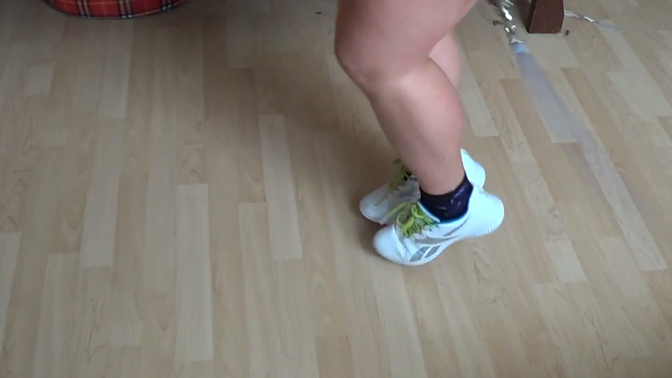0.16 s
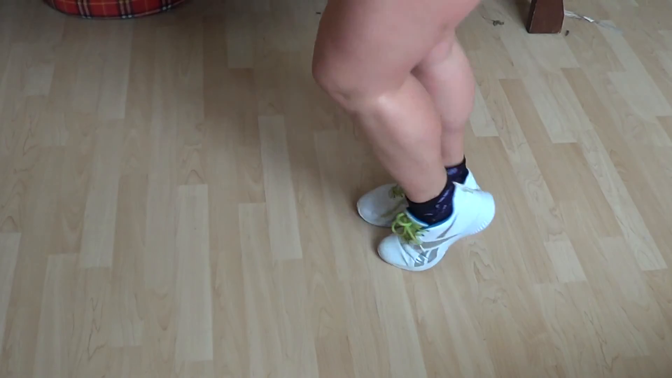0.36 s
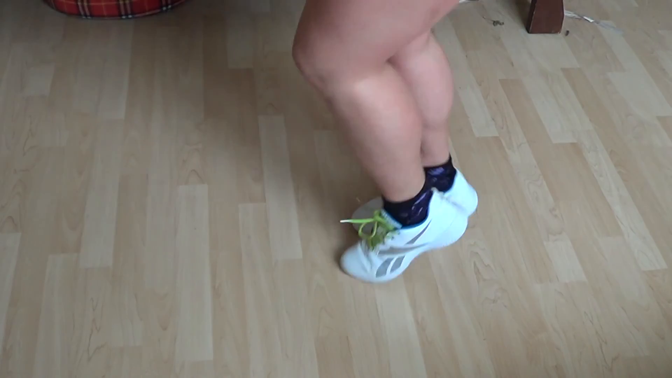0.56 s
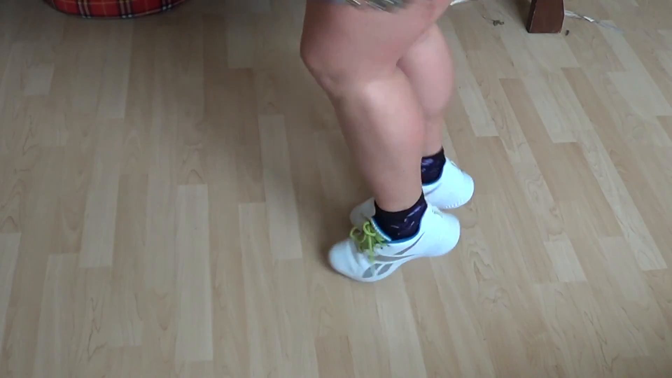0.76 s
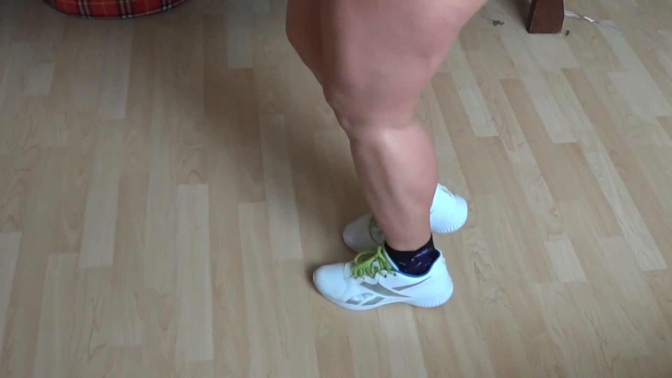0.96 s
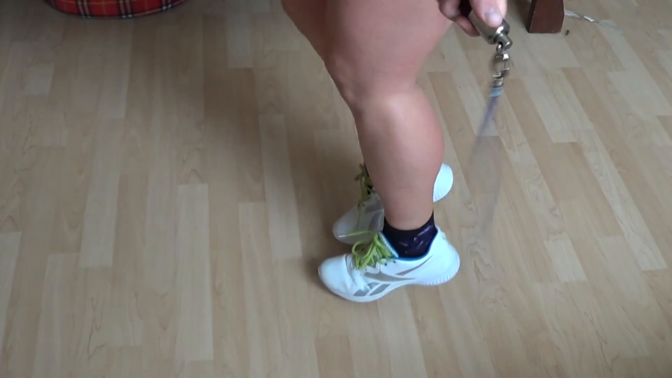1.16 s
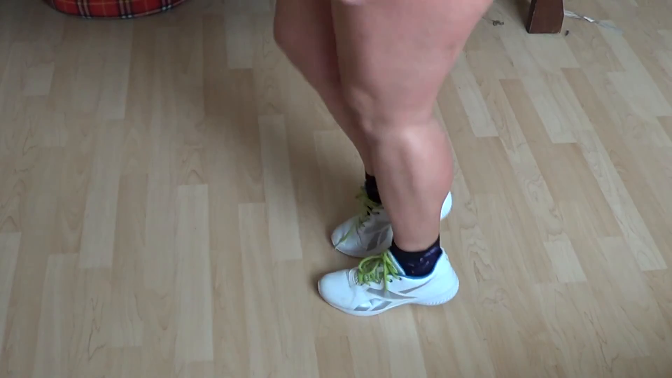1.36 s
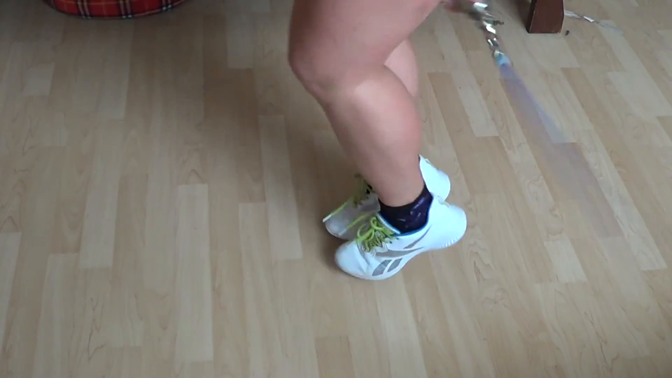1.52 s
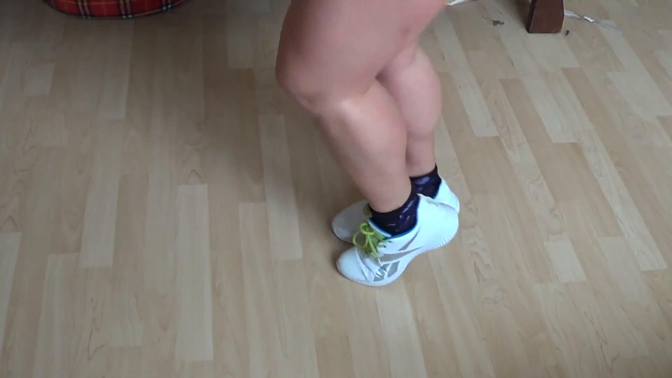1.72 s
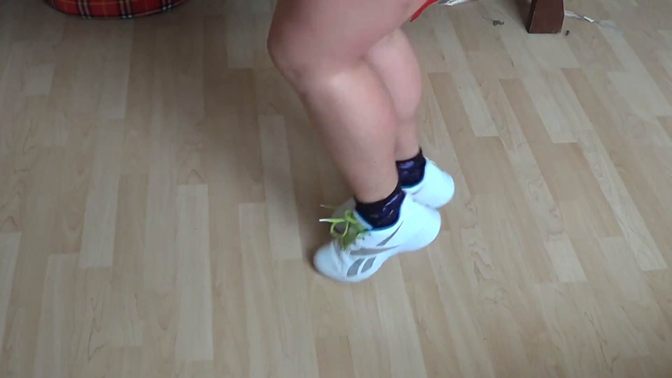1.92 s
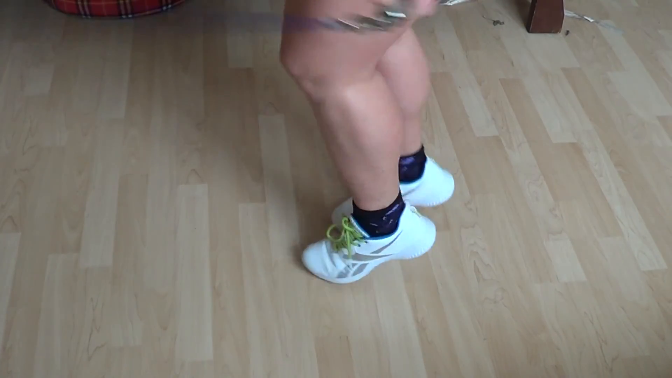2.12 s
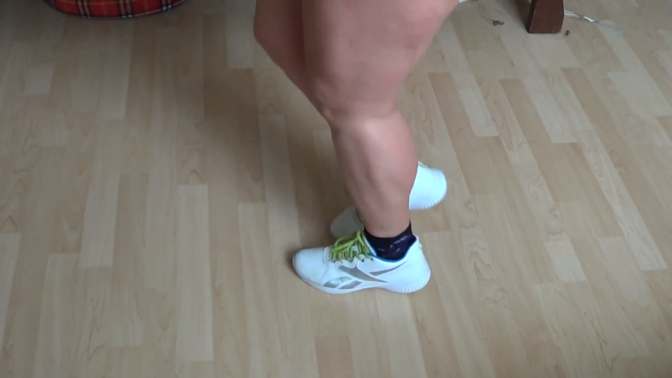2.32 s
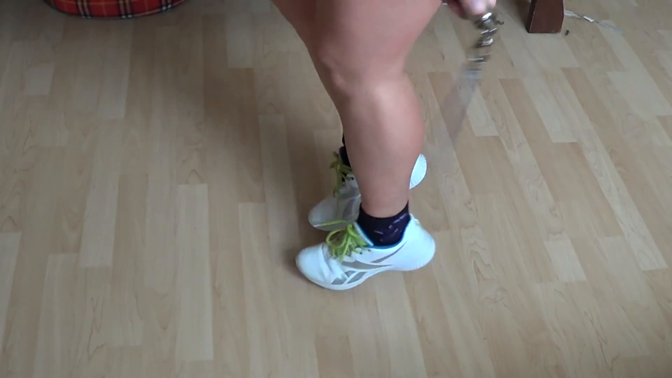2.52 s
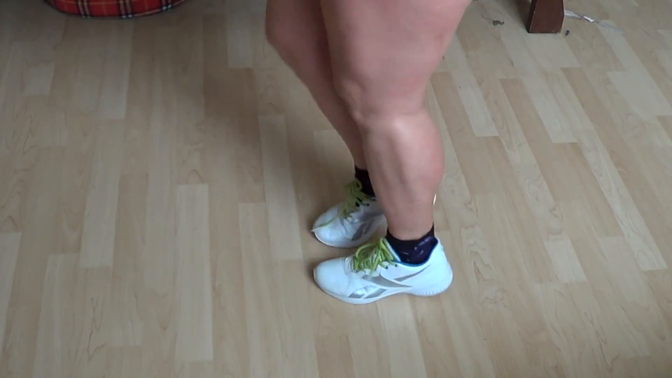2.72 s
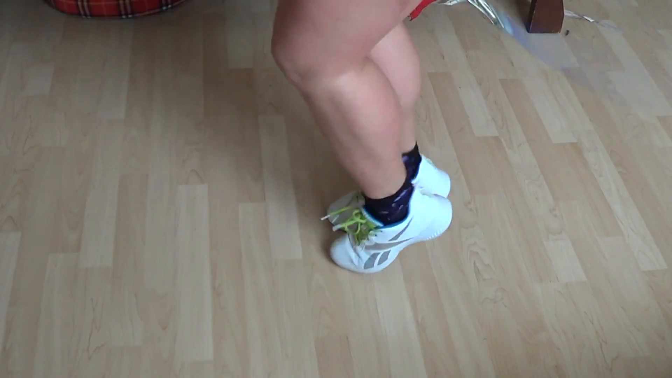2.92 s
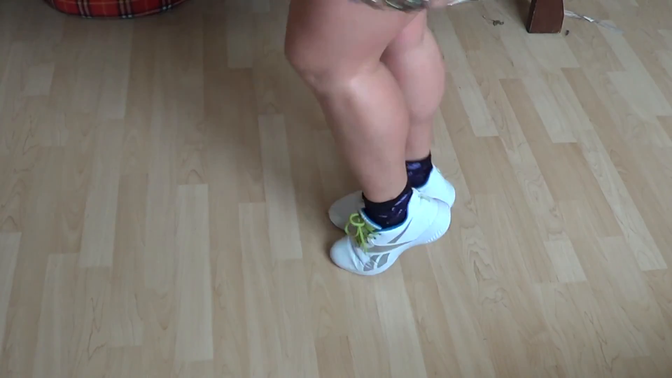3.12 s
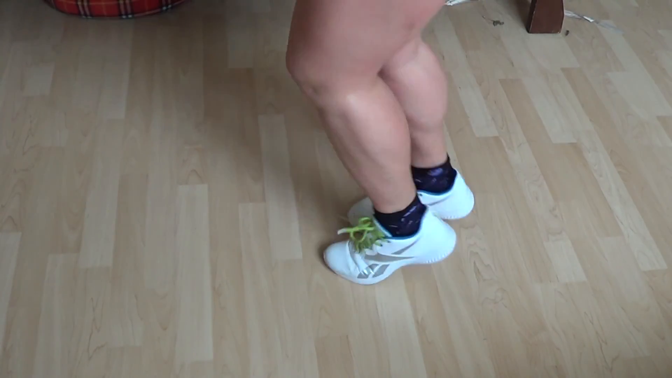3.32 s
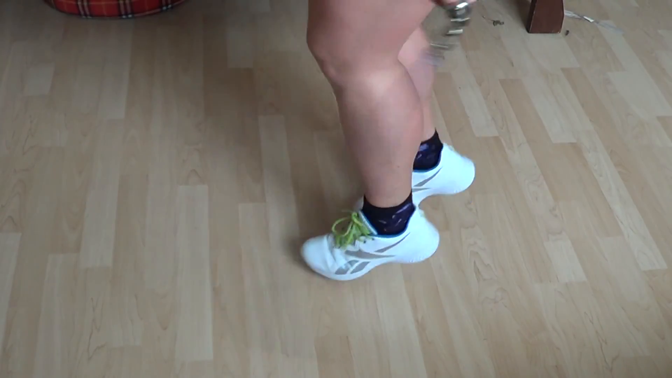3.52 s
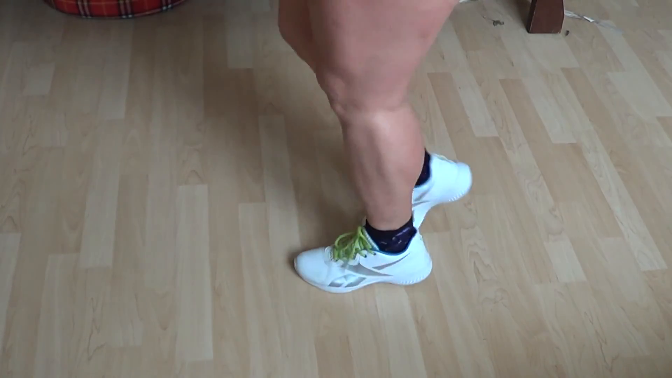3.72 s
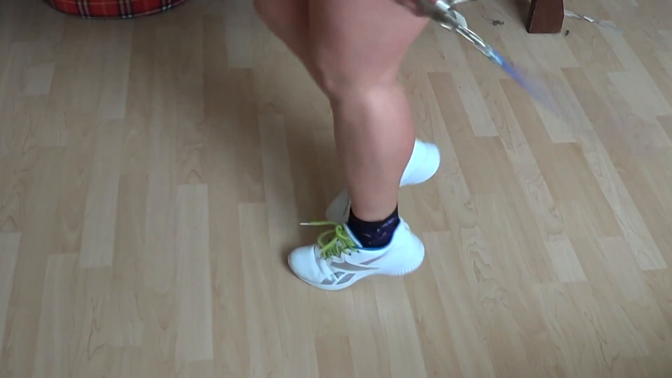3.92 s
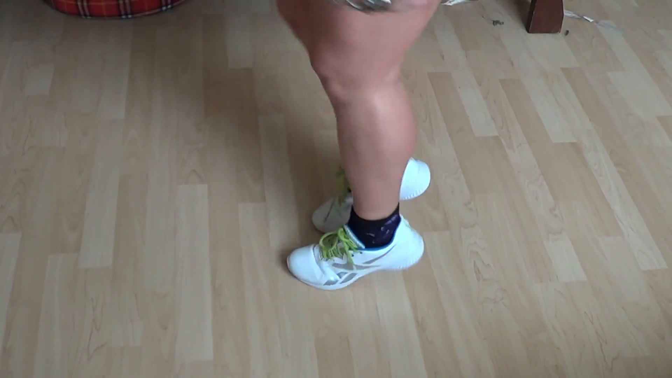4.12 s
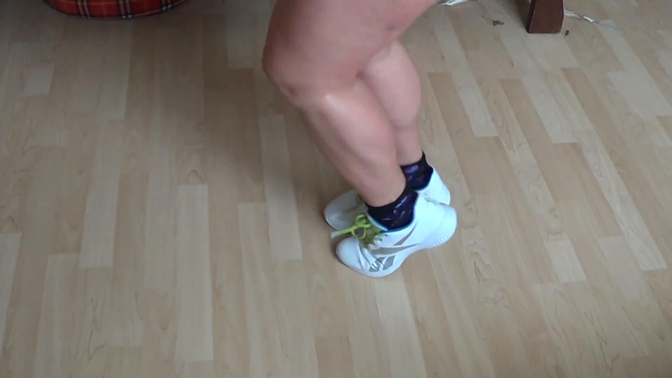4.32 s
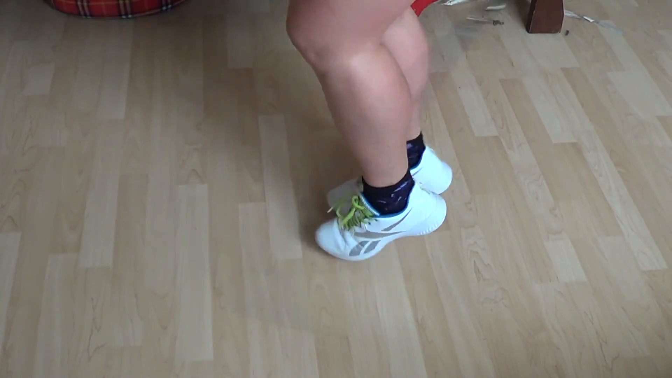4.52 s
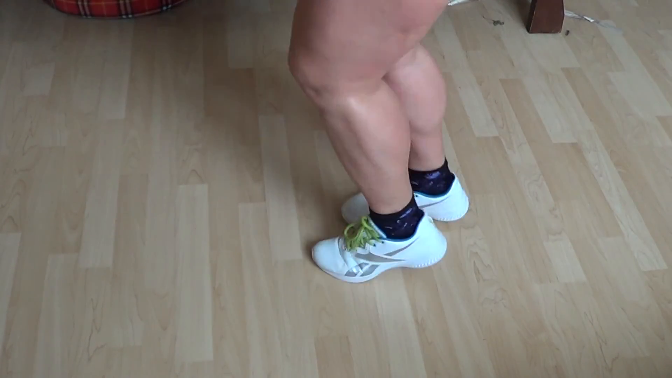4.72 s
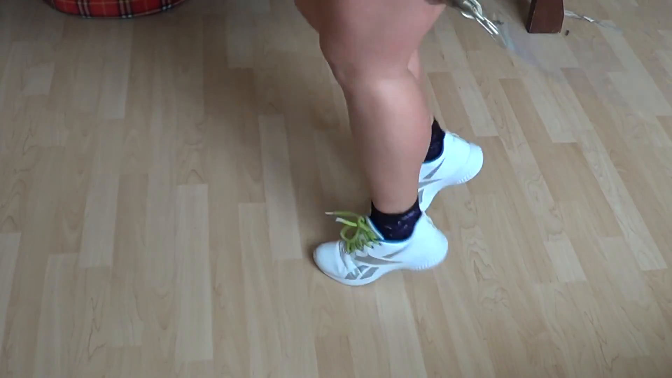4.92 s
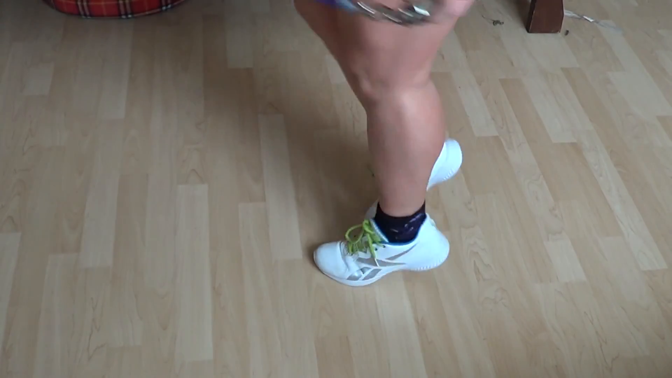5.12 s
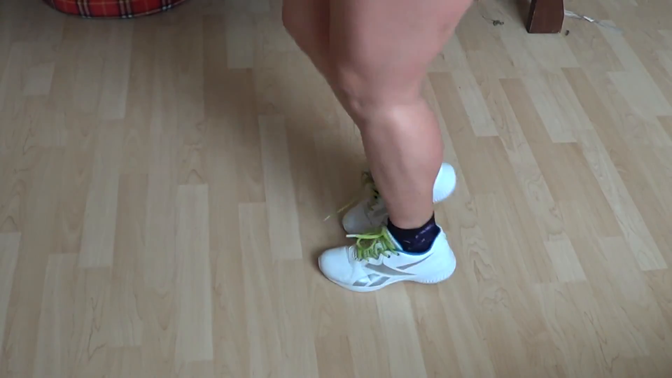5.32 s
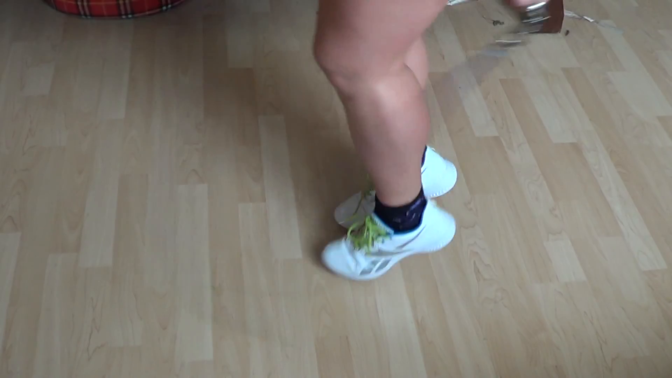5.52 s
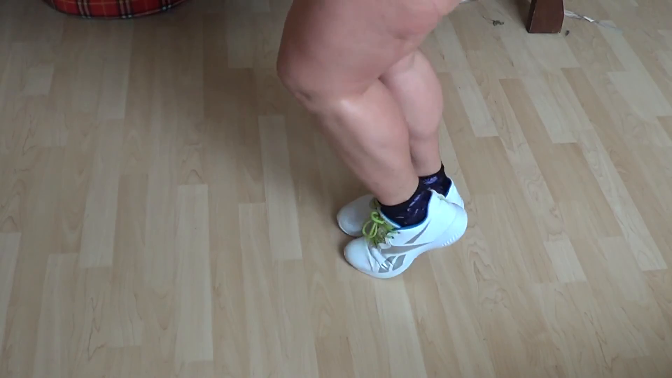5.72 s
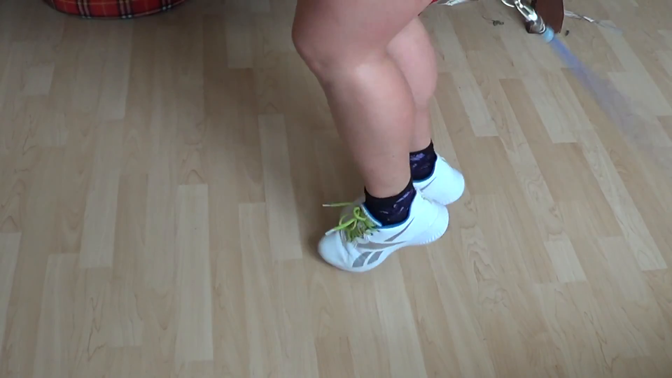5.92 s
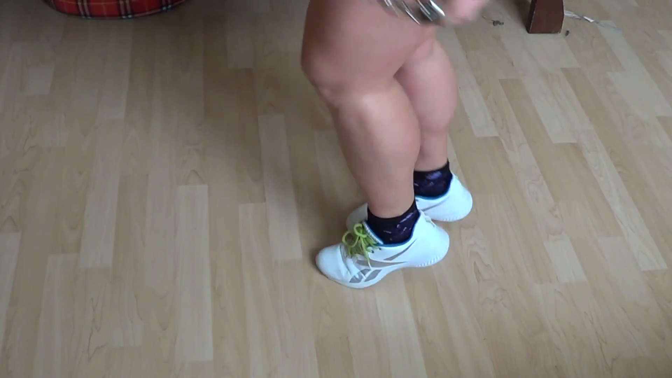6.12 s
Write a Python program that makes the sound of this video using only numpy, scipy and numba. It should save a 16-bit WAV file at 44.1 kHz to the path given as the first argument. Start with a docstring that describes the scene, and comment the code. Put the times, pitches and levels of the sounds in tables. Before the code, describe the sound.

Someone skips rope at a steady pace, about three turns a second, in a small bare room. Each turn brings a hard, bright crack on laminate with quick wall echoes and a short hissing ring. Between cracks the thin rope whistles, rising as it swoops down, and rubber soles tap and thud dully on the planks. The microphone is close, with automatic level control squeezing each crack and its room ring.

```python
"""A thin skipping rope cracks on a laminate floor three times a second in a small bare room.
Each crack is a filtered impulse with wall echoes and a noise tail; between cracks the rope
whistles as narrow bands of gliding noise. Shoes land in between as struck floor resonances and
gritty taps, over a faint steady hush. A fast level control ducks every crack, so the room's ring
first holds and then fades."""
import sys
import numpy as np
from scipy import signal
from scipy.fft import rfft, irfft, next_fast_len
from scipy.io import wavfile
from scipy.ndimage import uniform_filter1d, minimum_filter1d
from numba import njit

SR = 44100
rng = np.random.default_rng(int(sys.argv[2]) if len(sys.argv) > 2 else 0)


def waveform_to_disk(signal):
    """Save audio, clipped to [-1, 1], as 16-bit WAV at the path in sys.argv[1]."""
    frames = np.transpose(np.atleast_2d(signal))
    scaled = np.clip(frames, -1, 1) * 32767
    samples = np.round(scaled).astype(np.int16)
    wavfile.write(sys.argv[1], SR, samples)


N = 272097  # samples heard
LEAD = SR // 2  # samples played before the start, so earlier blows still ring


def undb(db):
    """Gain of a level in dB."""
    return 10 ** (np.asarray(db) / 20)


def along(table, hz):
    """Read a (Hz, value) table on a log-frequency axis."""
    table_hz, values = np.array(table).T
    return np.interp(np.log(np.maximum(hz, 1)), np.log(table_hz), values)


def interleave(*columns):
    """Turn columns of curve points into one running list, row after row."""
    return np.ravel(columns, order="F")


def train(start_s, size):
    """One impulse per event."""
    out = np.zeros(N + LEAD)
    np.add.at(out, (np.asarray(start_s) * SR).astype(int) + LEAD, size)
    return out


def pair(mid, side):
    """Left and right from mid and side."""
    return np.array([mid + side, mid - side])


def walk(rate):
    """Random levels held 1 / rate s and slewed."""
    hold = int(SR / rate)
    steps = np.repeat(rng.standard_normal((N + LEAD) // hold + 1), hold)
    return uniform_filter1d(steps, hold)[:N + LEAD]


def causal(gain):
    """Minimum-phase spectrum with this gain: nothing rings before the blow."""
    cepstrum = irfft(np.log(gain))
    cepstrum[1:len(gain) - 1] *= 2
    cepstrum[len(gain):] = 0
    return np.exp(rfft(cepstrum))


def ring(x, modes):
    """Sum of decaying resonances; a unit impulse starts each at its dB."""
    out = 0
    for hz, db, t60 in modes:
        pole = np.exp(2j * np.pi * hz / SR - np.log(1000) / (t60 * SR))
        out = out + undb(db) * signal.lfilter([1], [1, -pole], x).imag
    return out


@njit
def svf(x, hz, width):
    """State-variable band-pass with moving centre and width, gain 1 at the centre."""
    y, band, low = np.empty(len(x)), 0., 0.
    for i in range(len(x)):
        g, k = np.tan(np.pi * hz[i] / SR), width[i] / hz[i]
        v = (band + g * (x[i] - low)) / (1 + g * (g + k))
        band, low, y[i] = 2 * v - band, low + 2 * g * v, k * v
    return y


@njit
def follow(x, attack, release):
    """Envelope that jumps up fast and sinks more slowly."""
    y, e = np.empty(len(x)), 0.
    for i in range(len(x)):
        e += (x[i] - e) * (attack if x[i] > e else release)
        y[i] = e
    return y


# How long the room rings. Each row: frequency in Hz, decay time in s before each layer's own share.
ROOM_DECAY = [(200, 0.73), (1000, 0.48), (3000, 0.54), (5000, 0.53), (9000, 0.46), (12000, 0.32),
              (16000, 0.35)]
# Stereo spread of the room. Each row: frequency in Hz, side level minus mid level in dB.
ROOM_WIDTH = [(40, -47), (250, -14.5), (1000, -8), (3000, -9.5), (5500, -6.5), (9000, -7.5), (12000, -17),
              (16000, -82)]


def diffuse(power, colour, t60_share, rise_ms):
    """Dense reflections: overlapping noise bands, each swelling after a blow and dying at its own rate."""
    size = next_fast_len(N + LEAD)
    f = np.arange(size // 2 + 1) * SR / size
    gain = undb(along(colour, f))
    gain /= np.sqrt(np.mean(gain ** 2))
    mid = rfft(rng.standard_normal(size)) * gain
    side = rfft(rng.standard_normal(size)) * gain * undb(along(ROOM_WIDTH, f))
    rise = np.exp(-1000 / (rise_ms * SR))
    out = 0
    for hz in 25 * 2 ** np.arange(0, 9.6, .5):  # half-octave steps
        octaves_away = np.log2(np.maximum(f, 1) / hz)
        band = np.cos(np.pi * np.clip(octaves_away, -.5, .5)) ** 2  # neighbours sum to one
        fall = np.exp(-2 * np.log(1000) / (t60_share * along(ROOM_DECAY, hz) * SR))
        swell_and_fall = np.convolve([1, -fall], [1, -rise])
        shape = np.sqrt(signal.lfilter([1 - rise], swell_and_fall, power))
        noise = irfft([mid * band, side * band], size)[:, :N + LEAD]
        out = out + shape * pair(*noise)
    return out


# Tone of the house hush. Each row: frequency in Hz, relative level in dB per Hz.
HUSH_COLOUR = [(25, -18), (60, -4.5), (90, -16), (160, -7.5), (500, -14.5), (2000, -11.5), (5000, -9.5),
               (12000, -16), (17000, -53)]
HUSH_DB = -43.5


def house_hush():
    """Faint steady noise: one impulse into reflections that practically never decay."""
    return undb(HUSH_DB) * diffuse(train([-LEAD / SR], 1.), HUSH_COLOUR, 1e6, rise_ms=1.)


# Shoes landing. Each row: start in seconds, relative knock level in dB, pitch favoured by the spot in Hz,
# relative sole tap level in dB, relative weight on the boards in dB, relative weight on the joists in dB.
LANDINGS = [(-0.07, -25.5, 200, -30, -32, -35), (0.235, -25, 428, -28, -41.5, -35),
            (0.604, -28, 260, -20.5, -39.5, -41), (0.9, -25.5, 452, -22, -39, -52),
            (0.931, -27, 160, -30, -49, -26), (1.241, -21, 450, -16, -57, -35),
            (1.287, -28.5, 150, -30, -35.5, -44), (1.603, -27, 255, -39, -41, -35),
            (1.965, -21.5, 267, -20, -46, -30), (2.273, -24.5, 450, -22, -37.5, -48),
            (2.312, -24.5, 268, -25, -50, -29), (2.623, -22.5, 467, -26, -34.5, -46),
            (2.669, -32, 170, -42, -43, -34.5), (2.967, -28.5, 256, -46, -46.5, -36.5),
            (3.267, -30, 328, -21, -43, -44), (3.318, -26.5, 251, -26, -36.5, -31),
            (3.618, -26.5, 268, -19, -31, -49), (3.653, -27, 253, -26, -40, -43),
            (3.954, -25, 455, -42, -35.5, -42), (3.997, -26, 277, -40, -51, -26.5),
            (4.282, -30.5, 167, -44, -37.5, -41), (4.655, -26, 200, -24.5, -40, -31.5),
            (4.955, -24.5, 437, -27, -57.5, -49), (4.998, -41, 167, -30, -43, -35),
            (5.305, -26, 460, -32, -44.5, -31), (5.643, -29, 164, -28, -48, -38),
            (5.95, -37, 194, -29, -59, -43), (5.993, -29.5, 256, -41, -46, -31)]
# Plank resonances. Each row: pitch in Hz, relative level in dB, decay time in s.
PLANK_MODES = [(166.3, -10.5, 0.64), (192, -13, 0.34), (265.5, -6.5, 0.22), (342, -10, 0.088),
               (398, -18.5, 0.75), (430.4, -8.5, 0.27), (453, -8, 0.057), (590, -35, 0.054),
               (710, -30, 0.14)]
# Bending boards. Each row: pitch in Hz, relative level in dB, decay time in s.
BOARD_MODES = [(128, -39, 0.1), (125, 4, 0.41)]
# Joists below the boards. Each row: pitch in Hz, relative level in dB, decay time in s.
JOIST_MODES = [(35.6, -17, 0.83), (37, -3, 1), (50, -12, 0.92)]
SCUFF_DB = -9  # relative to each knock


def landings():
    """Soles tap and knock the planks, body weight then bends boards and joists; the room scatters the scuff."""
    start_s, knock_db, spot_hz, tap_db, boards_db, joists_db = np.transpose(LANDINGS)
    knock = 0
    for mode in PLANK_MODES:
        # modes far from the favoured pitch get less
        size = undb(knock_db - 11.4 * np.abs(np.log2(mode[0] / spot_hz)))
        # a second, weaker touch follows as the sole flattens
        touches = train(start_s, size) + 0.15 * train(start_s + 0.01096, size)
        knock = knock + ring(touches, [mode])
    knock = np.roll(uniform_filter1d(knock, size=40), 40)  # rubber rounds the knock

    fall = np.exp(-1 / (.005 * SR))
    tap_shape = signal.lfilter([1], [1, -fall], train(start_s, undb(tap_db)))
    grit = rng.standard_normal(N + LEAD) * tap_shape
    sole_band = signal.butter(2, [350, 2000], "bandpass", fs=SR, output="sos")
    tap = 3 * signal.sosfilt(sole_band, grit)

    # rubber loads the floor softly
    boards = uniform_filter1d(ring(train(start_s + 0.0183, undb(boards_db)), BOARD_MODES), 120)
    joists = ring(train(start_s + 0.031, undb(joists_db)), JOIST_MODES)
    joists = uniform_filter1d(uniform_filter1d(joists, 400), 400)

    scuff_colour = [(60, -12), (300, 7.5), (1000, 1), (2500, -0.5), (6000, -32)]  # (Hz, relative dB)
    scuff = diffuse(train(start_s, undb(2 * (knock_db + SCUFF_DB))), scuff_colour, 0.8, rise_ms=3.5)
    side = .15 * np.roll(knock + tap, 40) - 0.095 * (boards + joists)
    return pair(knock + tap + boards + joists, side) + scuff


def whistle(hz, db, width):
    """Vortices shed behind the rope sing: narrow, throbbing noise with a faint octave above."""
    def song(multiple):
        x = svf(rng.standard_normal(N + LEAD), multiple * hz, multiple * width)
        x = svf(x, multiple * hz, 2 * multiple * width)
        return x * np.sqrt(SR / (2 * multiple * width))  # evens the level across widths
    octave = undb(-19)
    mid = song(0.99) + octave * song(2.045)
    side = undb(-9.5) * (song(0.99) + octave * song(2.1))
    return undb(db + 2. * walk(60.)) * pair(mid, side)


# Rope blows on the floor, also setting the whistle up to the next blow. Each row: start in seconds,
# relative level in dB, brightness in dB per octave, relative thump level in dB, relative whistle level
# going up in dB, relative whistle level over the head in dB, central whistle pitch over the head in Hz.
BLOWS = [(-0.2, -12.5, 3, -25, -33, -41.5, 840), (0.1346, -12, 11, -22.5, -31, -39, 794),
         (0.4814, -11.5, -3, -22, -33, -39, 765), (0.832, -11, 10, -24, -33, -37, 820),
         (1.1632, -10.5, 1, -18.5, -32.5, -38, 754), (1.4943, -11.5, 9, -26, -35.5, -40.5, 790),
         (1.8309, -11.5, 15, -28, -32.5, -41.5, 800), (2.1854, -11, 3, -26, -31.5, -40, 810),
         (2.5287, -11.5, 16, -27, -33.5, -35, 780), (2.8714, -11.5, 5, -27.5, -32, -39, 810),
         (3.2026, -10.5, 16, -21.5, -31.5, -39.5, 770), (3.5394, -11.5, 10, -26, -32.5, -35.5, 750),
         (3.8729, -11.5, -2, -24, -30.5, -38.5, 770), (4.2143, -12.5, 12, -26.5, -35, -38, 854),
         (4.5437, -11.5, 16, -20, -32.5, -39.5, 840), (4.8711, -11, 3, -21, -30.5, -38.5, 830),
         (5.2034, -11.5, 16, -25, -31.5, -38.5, 750), (5.5473, -12, 22, -24.5, -33.5, -38, 770),
         (5.881, -11.5, -1, -24, -32, -40, 830)]
# Whistle of the loop coming down, one row a turn, ending on the next blow. Each row: start in seconds,
# start pitch in Hz and end pitch in Hz before the final whip, start level and end level in relative dB.
DOWNSWINGS = [(0.05, 827, 1030, -41, -30.5), (0.41, 910, 990, -41, -30.5), (0.765, 893, 995, -43, -29.5),
              (1.07, 830, 1020, -38.5, -30), (1.43, 970, 990, -38, -30), (1.76, 890, 1010, -45, -30),
              (2.12, 870, 960, -41, -33), (2.46, 900, 1020, -41.5, -30), (2.81, 890, 1070, -54, -29),
              (3.11, 866, 1006, -37, -30), (3.485, 980, 1000, -35, -28), (3.81, 896, 1055, -35.5, -32.5),
              (4.13, 810, 1000, -43.5, -35), (4.455, 808, 1060, -38, -29), (4.785, 863, 1040, -36, -31),
              (5.12, 863, 980, -41.5, -34), (5.47, 846, 1000, -49, -32.5), (5.79, 834, 1040, -49, -29.5),
              (6.14, 830, 1000, -34.5, -30)]
TURN_S = 0.32  # length of the turn after the last blow
ONSET_S, CUT_S = 0.009, 0.0069  # downswing fade in and fade out
RUSH_S, RUSH_SHARE = 0.035, 0.048  # final whip, in a turn of TURN_S, and its pitch gain
UP_AT, OVER_AT = 0.41, 0.59  # shares of the turn at climb and top
FADE_DB, BLOW_DB = -10.5, 9.5  # fade after the top; rush of air at the blow
CLIMB_HZ = 868  # centre of the climb's wandering pitch
CLIMB_WIDTH_HZ, OVER_WIDTH_HZ, BLOW_WIDTH_HZ = 230, 180, 610  # filter widths


def swings():
    """The loop whistles broadly climbing and sagging over the head, then narrowly, rising, as it speeds down."""
    t = (np.arange(N + LEAD) - LEAD) / SR
    quiet_db = -70
    start_s, _, _, _, up_db, over_db, over_hz = np.transpose(BLOWS)
    blows = np.append(start_s, start_s[-1] + TURN_S)
    count = np.interp(t, blows, np.arange(len(blows)))  # turns since the first blow
    turn = count % 1

    start, from_hz, to_hz, from_db, to_db = np.transpose(DOWNSWINGS)
    quiet = quiet_db + 0 * start
    knots = interleave(start - ONSET_S, start, blows[1:], blows[1:] + CUT_S)
    hz = np.interp(t, knots, interleave(from_hz, from_hz, to_hz, to_hz))
    db = np.interp(t, knots, interleave(quiet, from_db, to_db, quiet))
    rush = np.clip(1 - (1 - turn) * TURN_S / RUSH_S, 0, 1)  # the loop whips faster in its last moments
    down = whistle(hz * (1 + RUSH_SHARE * rush), db, 75. + 50. * rush)

    k = np.arange(len(start_s))
    knots = interleave(k + .035, k + .1, k + UP_AT, k + OVER_AT, k + 1.015)
    levels = interleave(up_db + BLOW_DB, up_db - 3, up_db - 3.5, over_db, over_db + FADE_DB)
    db = np.interp(count, knots, levels)
    knots = interleave(k + UP_AT + 0.12, k + OVER_AT + 0.037)
    hz = np.interp(count, knots, interleave(CLIMB_HZ + 0 * k, over_hz))
    widths = [BLOW_WIDTH_HZ, CLIMB_WIDTH_HZ, CLIMB_WIDTH_HZ, OVER_WIDTH_HZ, OVER_WIDTH_HZ, BLOW_WIDTH_HZ]
    width_hz = np.interp(turn, [0, .1, UP_AT, OVER_AT, .9, 1], widths)
    return down + whistle(hz * (1 + 0.026 * walk(12.)), db, width_hz)


# Tone of the bare crack. Each row: frequency in Hz, relative level in dB.
CRACK_COLOUR = [(60, -9), (250, -1), (1000, -12), (3000, -87), (5500, 7.5), (7500, -14), (10000, 16),
                (13000, 0), (17000, -7)]
# Tone of the room's answer. Each row: frequency in Hz, relative level in dB per Hz.
RING_COLOUR = [(200, -15.5), (500, -16), (1000, -7), (2000, -11.5), (2800, -11), (3500, -8), (4300, -0.5),
               (6000, 1), (8600, 2.5), (11000, -1.5), (14500, -13), (17000, -26)]
# Echoes off near walls. Each row: delay in ms, level in dB before a random variation,
# side share, brightness in dB per octave.
ECHOES = [(1.4, -12, .3, 6), (2.8, -2, 1, -9), (4, -7, .5, -8), (5.4, -8, .3, -8), (12.4, -7, 0.026, 0),
          (14.6, -7, 0.55, 0), (17.4, -5, -0.28, -9), (23.3, -2, 0.09, 7), (31, -9, -0.32, -6),
          (34.5, -4, -0.16, 6), (44.8, -6, -.2, 5)]
CRACK_DB = 23.5  # added to each blow's level


def cracks():
    """Each blow is a scattered click, repeated duller and more smeared by near walls."""
    size = 4096
    f, t = np.arange(size // 2 + 1) * SR / size, np.arange(128) / SR
    out = np.zeros((2, N + LEAD + size))
    # echoes keep some of the crack's colour
    dull = causal(undb(along(RING_COLOUR, f) + 0.3 * along(CRACK_COLOUR, f)))
    for start_s, db, tilt_db, *_ in BLOWS:
        # every surface scatters the crack its own way
        noise = rng.standard_normal((len(ECHOES) + 1, 128))
        smear = rfft(noise * np.exp(-t / .0003), size) / 3
        tilt = tilt_db * np.log2(np.clip(f, 3000, 11000) / 8000)
        colour = undb(along(CRACK_COLOUR, f) + tilt)
        mid = causal(colour) / np.mean(colour) * (1 + 0.06 * smear[0])
        side = .1 * mid
        for (ms, echo_db, share, bright_db), scatter in zip(ECHOES, smear[1:]):
            vary_db = 2. * rng.standard_normal()
            echo_tilt = bright_db * np.log2(np.clip(f, 4000, 11000) / 7500)
            delay = np.exp(-2j * np.pi * f * ms / 1000)
            echo = undb(echo_db + vary_db + echo_tilt) * dull * (1 + 1.2 * scatter) * delay
            mid, side = mid + echo, side + share * echo
        i = int((start_s + 0.0011) * SR) + LEAD
        out[:, i:i + size] += undb(db + CRACK_DB) * pair(irfft(mid), irfft(side))
    return out[:, :N + LEAD]


# Furniture that answers the blow. Each row: pitch in Hz, relative level in dB, decay time in s.
FURNITURE_MODES = [(727, 1.5, 0.086), (1065, 3.5, 0.11), (1746, 5, 0.029), (2320, -1, 0.034)]
RING_DB = 4.5  # added to each blow's level


def slaps():
    """The rope's blow cracks, thumps the floor, wakes hollow furniture and sets off the room's ring."""
    start_s, db, _, thump_db = np.transpose(BLOWS)[:4]
    floor_modes = [(hz, level - 15, t60) for hz, level, t60 in BOARD_MODES + PLANK_MODES]
    thump_modes = [(232, 1.6, 0.0056)] + floor_modes  # a short thud first
    thump = ring(train(start_s + 0.0012, undb(thump_db)), thump_modes)
    hollow = uniform_filter1d(ring(train(start_s + .011, undb(db - 15.5)), FURNITURE_MODES), 8)
    flutter = undb(1.8 * walk(130.))  # reflections arrive in bunches between the bare walls
    blow_power = train(start_s + 0.00048, undb(2 * (db + RING_DB)))
    tail = flutter * diffuse(blow_power, RING_COLOUR, 0.89, rise_ms=15.7)
    return cracks() + pair(thump + hollow, 0.059 * thump + 0.13 * hollow) + tail


def scene():
    """The faint hush of the house, the shoes and the rope, with the lead-in trimmed off."""
    return (house_hush() + landings() + swings() + slaps())[:, LEAD:]


def record(dry):
    """Gain control that looks 4 ms ahead, a soft ceiling, then the top is cut."""
    ahead = int(.004 * SR)
    loud = follow(np.abs(dry).max(axis=0), 1 / (0.00035 * SR), 1 / (0.013 * SR))
    gain = np.minimum(1, (undb(-11) / (loud + 1e-9)) ** 0.87)  # only ever turns down
    gain = minimum_filter1d(np.roll(gain, -ahead // 2), ahead)
    gain = uniform_filter1d(gain, ahead // 4)
    ceiling = .82
    balance = undb([[.2], [-.2]])  # left a touch louder
    even = ceiling * np.tanh(dry * gain * balance / ceiling)
    top_cut = signal.ellip(10, .2, 80, 16300, fs=SR, output="sos")  # low-pass at 16300 Hz
    return signal.sosfilt(top_cut, even)


dry = scene()
out = record(dry)
waveform_to_disk(out)
```